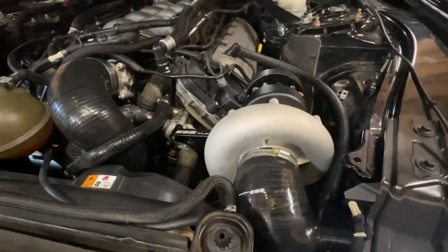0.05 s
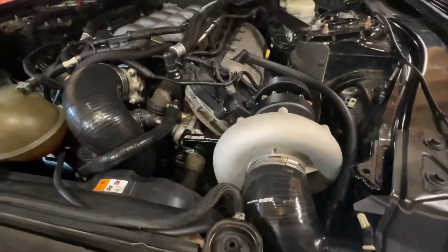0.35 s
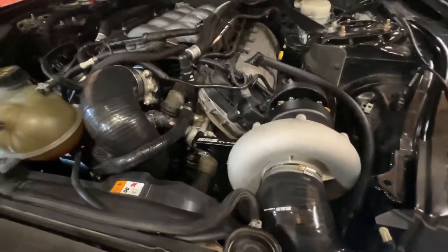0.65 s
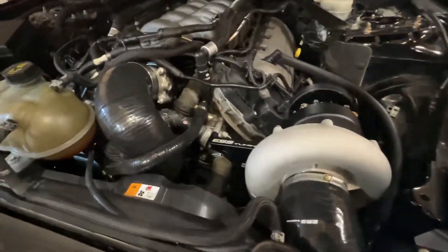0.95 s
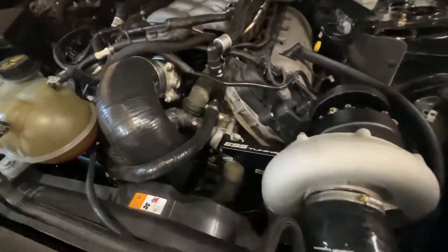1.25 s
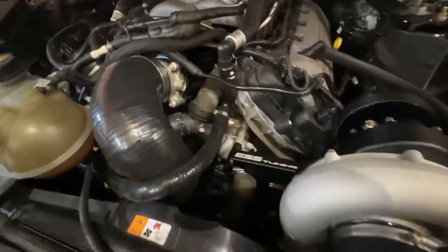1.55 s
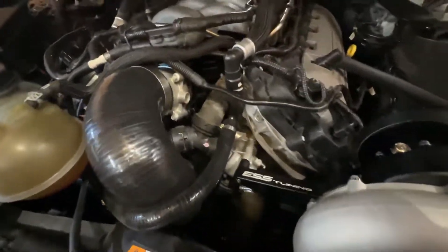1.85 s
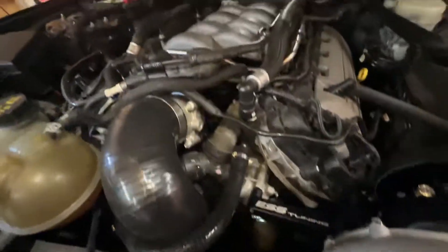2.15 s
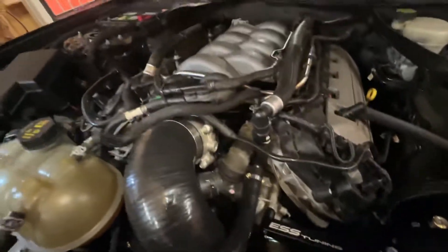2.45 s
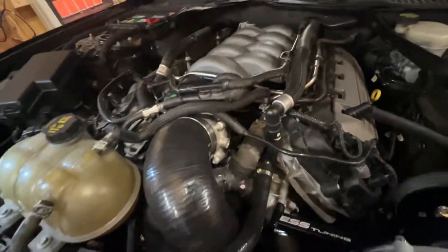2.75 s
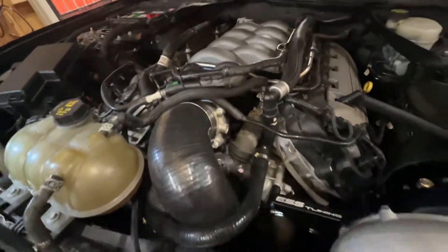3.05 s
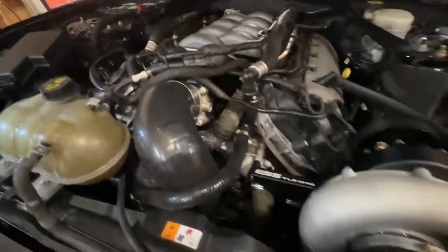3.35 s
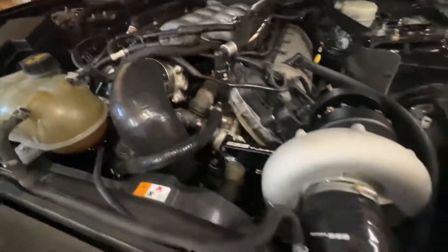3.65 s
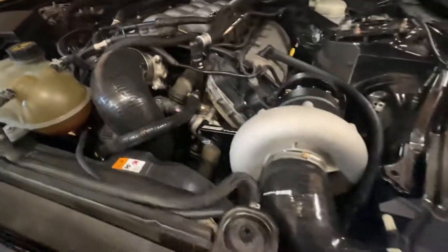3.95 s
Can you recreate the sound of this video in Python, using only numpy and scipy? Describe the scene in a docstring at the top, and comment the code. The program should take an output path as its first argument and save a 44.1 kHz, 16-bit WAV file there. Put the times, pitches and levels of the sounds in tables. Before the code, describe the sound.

Close, steady idle of a supercharged V8, droning low under whirring gears and belts.

```python
"""A supercharged V8 idles under an open bonnet, the microphone drifting close over the engine bay.
Eight unequal firings ring the exhaust into a loping drone. The supercharger gears whine and rattle,
air rushes through the throttle body, belts and fan rush, pulleys sing and the valve train ticks,
over a low rumble and a faint metallic ring. Near the end the sound skips once, with a small click,
and a soft squeak follows."""
import sys
import numpy as np
from scipy.fft import rfft, irfft, next_fast_len
from scipy.io import wavfile
from scipy.ndimage import map_coordinates

SR = 44100
rng = np.random.default_rng(int(sys.argv[2]) if len(sys.argv) > 2 else 0)


def wav_record(signal):
    """Record a signal, one row per channel, as 16-bit PCM in the file named by sys.argv[1]."""
    frames = np.transpose(np.atleast_2d(signal))
    bounded = np.clip(frames, -1, 1)
    # unit amplitude maps onto the largest positive 16-bit level
    quanta = np.round(bounded * 32767).astype(np.int16)
    wavfile.write(sys.argv[1], SR, quanta)


N = 176400
LEAD = SR // 2  # spare samples at each end
T = np.arange(-LEAD, N + LEAD) / SR
HZ = np.fft.rfftfreq(len(T), 1 / SR)
IDLE_RPM, START_CYCLE = 925, .868  # nominal speed; place in the four-stroke cycle at time zero

# How alike the microphone's two sides are. Each row: frequency in Hz, likeness from 0 to 1.
LIKENESS = [(100, .99), (250, .75), (500, .7), (1000, .72), (2000, .62), (4000, .35), (6000, .4),
            (7500, .15), (12000, .22)]
# Phase across the microphone. Each row: frequency in Hz, lead of the left in radians.
LEFT_LEAD = [(0, 3), (550, 0.5), (780, 0.5), (1050, -0.5), (1500, -3.5), (2000, -4.5), (3450, -7.5),
             (4050, -6.5), (6030, -4.5), (6630, -5), (9000, -5.5)]
# Where the broad noises sit. Each row: frequency in Hz, left minus right in dB.
BALANCE = [(100, 3), (260, 1), (600, 1), (1000, 1), (1400, 3.5), (2300, -3), (3300, 5.5), (5000, 5.5),
           (6500, 15), (7800, 1), (9000, 1), (15000, -0.5)]

# Spectra of rumble, belts, hiss and intake air. Each row: frequency in Hz, relative density in dB.
RUMBLE_SPECTRUM = [(20, -16), (45, -8), (70, 2), (130, -7), (190, 1), (350, -4), (520, -7), (900, -68)]
BELT_SPECTRUM = [(200, -14), (400, -4), (580, 2), (720, 0.5), (920, -3.5), (1080, -3), (1400, -4.5),
                 (1800, -1.5), (2300, -6), (3000, -24.5), (4500, -38)]
HISS_SPECTRUM = [(1200, -30), (2500, 3), (3200, -.5), (4700, -1.3), (6300, 1), (7600, -.8), (9000, -2.7),
                 (10000, -5.3), (11500, -6), (13000, -8.5), (15500, -8.3)]
INTAKE_SPECTRUM = [(900, -30), (1250, 12), (1700, -10), (2700, 11.5), (3200, 0.5), (3750, 5.5), (4500, 2),
                   (5500, 3), (7500, -23)]
# Resonances of the high ring and the housing; pulley and supercharger gear tones at idle.
# Each row: frequency in Hz, width in Hz, relative level in dB, left minus right in dB.
RING_MODES = [(6060, 260, -2, 10), (6680, 520, 0, 8), (5750, 350, -6, 8)]
HOUSING_MODES = [(3520, 100, 0, 0), (3750, 350, -1, 2)]
PULLEY_TONES = [(784, 17.3, -6.5, -10), (889.6, 100, -1.5, 6), (931.6, 75, -2.5, -6),
                (578.7, 40.8, -8.5, -2)]
GEAR_TONES = [(1912, 55, -3, 3.5), (2165, 70, -9, 15), (1732, 160, -15.5, -17)]
# Ring, housing, hiss with ticks, pulleys, intake and exhaust rasp at the drifting microphone.
# Each row: time in seconds, relative level in dB.
RING_LEVELS = [(0, -47), (.85, -45), (1.3, -47), (2.1, -43), (3.2, -45), (3.5, -49), (3.75, -46), (4, -50)]
HOUSING_LEVELS = [(0, -54), (.8, -50), (1.05, -57), (1.5, -50), (1.9, -46), (2.3, -48), (3.1, -48),
                  (3.32, -46), (3.55, -55), (4, -52)]
HISS_LEVELS = [(0, -41), (1, -40.7), (2.1, -39.7), (3.2, -40.5), (4, -42.3)]
PULLEY_LEVELS = [(0, -37.5), (1, -35), (1.9, -30.5), (2.6, -33), (3.3, -33), (4, -36.5)]
INTAKE_LEVELS = [(0, -45), (1.2, -42), (1.9, -41.5), (2.4, -39), (2.9, -41), (3.3, -41.5), (3.6, -48),
                 (4, -44)]
RASP_LEVELS = [(0, -31), (.4, -32.5), (1, -34.5), (2, -36.5), (2.5, -45), (3.2, -44), (3.6, -33.5),
               (4, -36)]
# Machinery at the microphone. Each row: time in seconds, belt rush and gear rattle in relative dB.
BAY_LEVELS = [(0, -29, -37), (.19, -28, -25), (.52, -29.5, -37), (.74, -29, -26.5), (1, -29, -40),
              (1.5, -28.5, -29.5), (2, -28.5, -29.5), (2.3, -30, -24), (2.65, -29.5, -25.5),
              (2.92, -30.5, -24.5), (3.2, -30.5, -23), (3.44, -29.5, -25), (3.56, -29.5, -28),
              (3.87, -29, -26), (4, -31.5, -26.5)]
# The squeak. One row: peak time in seconds, pitch in Hz, fade time in seconds, level in dB.
SOFT_SQUEAK = (3.465, 2490, .022, -34)
# Gear whirr. Each row: time in seconds, pitch in Hz, level and octave level in relative dB.
WHIRR_PATH = [(0, 1985, -28, -50), (.2, 1980, -29, -42), (.36, 2044, -28, -47), (.56, 2030, -33, -51),
              (.77, 2050, -28.5, -42), (.98, 2038, -36, -53), (1.3, 2068, -26, -42.5),
              (1.47, 2045, -35, -51), (1.6, 2054, -29, -51), (1.85, 2020, -35, -49), (2.25, 2029, -28, -45),
              (2.45, 1993, -28, -45), (2.68, 2066, -26, -47), (2.93, 2007, -26, -44),
              (3.15, 1975, -31, -50), (3.33, 1967, -29, -51), (3.6, 1976, -33, -48), (4, 1970, -33, -47)]
# Supercharger whistle. Each row: time in seconds, pitch in Hz, relative level in dB.
WHISTLE_PATH = [(0, 6090, -47), (.18, 6020, -45), (.55, 6110, -51), (.85, 6040, -46), (1.05, 6050, -42.5),
                (1.25, 6020, -47), (1.64, 6080, -46), (1.73, 6060, -38.5), (1.97, 6065, -38.5),
                (2.1, 6050, -42), (2.24, 6085, -39.5), (2.4, 6020, -42.5), (2.6, 6090, -38),
                (2.88, 5960, -41.5), (3.22, 5880, -43.5), (3.32, 6000, -43.5), (3.5, 5900, -53),
                (3.63, 5860, -47), (3.76, 5960, -42), (4, 5900, -52)]

# Crank speed. Each row: time in seconds, revolutions per minute.
CRANK_RPM = [(0, 935), (.2, 927), (.45, 935), (.8, 923), (1.05, 933), (1.25, 928), (1.6, 928.5), (2.2, 921),
             (2.55, 910.5), (2.75, 932.5), (3.05, 913), (3.4, 904), (4, 905)]
# Cylinders in firing order. Each row: strength in dB, lateness at the tailpipe in milliseconds.
FIRINGS = [(1, 1), (.1, 1.26), (-1.7, -2.28), (1.8, -1.17), (-4.4, .3), (-5.4, .65), (-9.2, -.91),
           (.3, 1.36)]
# Exhaust resonances, low to high. Each row: frequency in Hz, width in Hz, relative level in dB.
BOOM_MODES = [(65, 6.2, 0)]
DRONE_MODES = [(114, 18.3, 1), (141, 41, -46), (177.2, 10.8, -18), (212.4, 33, -30)]
GROWL_MODES = [(254.8, 15.2, 4), (274.6, 18, -13)]
RASP_MODES = [(320.8, 17, 3.5), (350.2, 11.6, -7)]
# Exhaust at the microphone. Each row: time in seconds, then boom, drone and growl in dB.
EXHAUST_LEVELS = [(0, -25, -17, -32), (.4, -21.5, -16, -29), (1.4, -24.5, -16.5, -31),
                  (2.2, -23.5, -16, -34), (2.55, -28.5, -20, -36.5), (2.78, -23, -15.5, -34.5),
                  (3.25, -27.5, -20, -33), (3.48, -24.5, -18, -33), (3.75, -26, -20.5, -33.5),
                  (4, -26.5, -20, -34)]


def amp(db):
    """Decibels to gain."""
    return 10 ** (np.asarray(db) / 20)


def unit(x):
    """Scaled to rms 1."""
    return x / np.sqrt(np.mean(np.abs(x) ** 2) + 1e-20)


def along(points):
    """(Hz, value) points read on a log frequency axis."""
    hz, values = np.transpose(points)
    return np.interp(np.log(HZ + 1), np.log(hz + 1), values)


def curves(rows):
    """One value per sample for each column after the time."""
    times, *columns = np.transpose(rows)
    return [np.interp(T, times, column) for column in columns]


def fader(levels):
    """A gain curve from (seconds, dB) points."""
    return amp(curves(levels)[0])


def wobble(rate):
    """A smooth random curve, rate knots a second."""
    return map_coordinates(rng.standard_normal(4096), [(T - T[0]) * rate], mode="wrap")


def noise():
    """Two unrelated white noises."""
    return rng.standard_normal((2, len(T)))


def filtered(x, response):
    """x times a response on the frequency grid."""
    return irfft(rfft(x) * response, len(T))


def panned(db):
    """Left and right gains, the left louder by db."""
    return np.sqrt(2 / (1 + np.array([amp(-db), amp(db)]) ** 2)).reshape(2, -1)


def placed(pair):
    """Two unrelated signals become the partly alike left and right of the microphone."""
    turn = np.arccos(np.clip(along(LIKENESS), -1, 1)) / 2
    mid, side = filtered(pair, np.array([np.cos(turn), np.sin(turn)]))
    phase_shift = np.exp(.5j * np.outer([1, -1], along(LEFT_LEAD)))
    return filtered(np.array([mid + side, mid - side]), phase_shift)


def spread(pair, spectrum):
    """Two unrelated signals coloured and spread across the microphone, rms 1."""
    return unit(filtered(placed(pair), amp(along(spectrum)) * panned(along(BALANCE))))


def strokes(cycle, count):
    """Number within the cycle and time of something that happens count times a cycle."""
    n = np.arange(np.ceil(cycle[0] * count), cycle[-1] * count).astype(int)
    return n % count, np.interp(n / count, cycle, T)


def pulses(times, sizes):
    """Impulses at the given times."""
    samples = np.round((times - T[0]) * SR).astype(int) % len(T)
    return np.bincount(samples, sizes, len(T))


def tone(hz, width, pan_db):
    """A tone on a pitch curve; backlash makes the pitch stray, the wider the faster."""
    stray_hz = width / 2 * np.array([wobble(rate=1.6 * width), wobble(rate=1.6 * width)])
    phase = 2 * np.pi * np.cumsum(hz + stray_hz, axis=1) / SR
    return panned(pan_db) * unit(placed(np.sin(phase)))


def flutter(depth_db=3.5):
    """The quick, uneven swelling of meshing gears, rms 1."""
    return unit(amp(depth_db * wobble(rate=105)))


def whine(tones, speed):
    """Tones that follow the shaft speed, each with its own flutter."""
    return sum(amp(db) * flutter() * tone(hz * speed, width, pan_db) for hz, width, db, pan_db in tones)


def rumble():
    """A low, steady noise behind the engine."""
    return amp(-31) * spread(noise(), RUMBLE_SPECTRUM)


def metal_ring(modes, levels):
    """Metal such as the housing and brackets, kept ringing by random contact that comes and goes."""
    power = 0
    for hz, width, db, pan_db in modes:
        peak = unit(1 / (1 + (2 * (HZ - hz) / width) ** 2))
        power += (amp(db) * panned(pan_db) * peak) ** 2
    ring = filtered(placed(noise()), np.sqrt(power))
    contact = unit(amp(1.4 * wobble(rate=8.8)))
    return fader(levels) * ring * contact


def squeak():
    """A short, soft squeak that swells and fades, dead centre."""
    peak_s, hz, fade_s, db = SOFT_SQUEAK
    return amp(db) * np.exp(-((T - peak_s) / fade_s) ** 2) * tone(hz, width=59.7, pan_db=0)


def intake():
    """Air rushing through the throttle body, to the left, louder as the microphone nears it."""
    air = unit(filtered(placed(noise()), amp(along(INTAKE_SPECTRUM))))
    return fader(INTAKE_LEVELS) * panned(db=5.5) * air


def valve_train(cycle, decay_s=.003, scatter_db=1.8, jitter_s=.0016):
    """Valves and injectors: short, loosely timed ticks tied to the camshaft, in a flickering hiss."""
    _, times = strokes(cycle, count=16)
    size, slip = rng.standard_normal((2, len(times)))
    impacts = pulses(times + jitter_s * slip, amp(scatter_db * size))
    decays = filtered(impacts, 1 / (1 + 2j * np.pi * HZ * decay_s))
    ticks = amp(-4.5) * spread(decays * noise(), HISS_SPECTRUM)
    hiss = amp(.5) * spread(noise(), HISS_SPECTRUM)
    flicker = amp(.9 * wobble(rate=82))
    return fader(HISS_LEVELS) * flicker * (hiss + ticks)


def pulleys(speed):
    """The pulleys sing, their pitch following the crank."""
    return fader(PULLEY_LEVELS) * whine(PULLEY_TONES, speed)


def belts(boost_db=2, flicker_db=1.23):
    """Belts and fan: a broad, flickering rush close to the microphone."""
    rush_db, _ = curves(BAY_LEVELS)
    return amp(rush_db + boost_db + flicker_db * wobble(rate=110)) * spread(noise(), BELT_SPECTRUM)


def supercharger(speed):
    """Meshing gears rattle and whirr; a thin, raspy whistle comes and goes on the left."""
    _, rattle_db = curves(BAY_LEVELS)
    whirr_hz, whirr_db, octave_db = curves(WHIRR_PATH)
    whistle_hz, whistle_db = curves(WHISTLE_PATH)
    whirr = amp(whirr_db) * tone(whirr_hz, width=65, pan_db=-3.5)
    octave = amp(octave_db) * tone(2 * whirr_hz, width=130, pan_db=2.5)
    whistle = amp(whistle_db) * tone(whistle_hz, width=140, pan_db=11)
    rattle = amp(rattle_db) * whine(GEAR_TONES, speed)
    return rattle + (whirr + octave) * flutter() + whistle * flutter()


def pipe(firing, modes):
    """Firing pulses ring the exhaust's steep resonances, rms 1."""
    response = 0
    for hz, width, db in modes:
        band = 1j * HZ * width / (hz ** 2 - HZ ** 2 + 1j * HZ * width)
        response += amp(db) * band ** 2
    return unit(filtered(firing, response))


def exhaust(cycle, scatter_db=.8, jitter_ms=.16, growl_lope_db=1, rasp_lope_db=6.5):
    """Each cylinder sends its own pulse down the pipes; the uneven pattern makes the lope."""
    cylinder, times = strokes(cycle, count=8)
    strength_db, late_ms = np.array(FIRINGS)[cylinder].T
    size, slip = rng.standard_normal((2, len(times)))
    late_s = (late_ms + jitter_ms * slip) / 1000
    firing = pulses(times + late_s, amp(strength_db + scatter_db * size))
    boom_db, drone_db, growl_db = curves(EXHAUST_LEVELS)
    lope = np.cos(2 * np.pi * (cycle - .93))  # one swell, late in each cycle
    boom = amp(boom_db) * pipe(firing, BOOM_MODES)
    drone = amp(drone_db) * pipe(firing, DRONE_MODES)
    growl = amp(growl_db) * unit(pipe(firing, GROWL_MODES) * amp(growl_lope_db * lope))
    rasp = fader(RASP_LEVELS) * unit(pipe(firing, RASP_MODES) * amp(rasp_lope_db * lope))
    return boom + drone + (growl + rasp) * panned(db=-4.5)


def skipped(x, at_s=3.4232, jump_s=.025, click_db=-17.5, click_decay_s=.00008):
    """N samples of x in which the sound jumps ahead a moment, with a click."""
    n, at = np.arange(N), round(at_s * SR)
    after = n >= at
    click = amp(click_db) * after * np.exp(-np.abs(n - at) / SR / click_decay_s)
    return x[:, LEAD + n + after * round(jump_s * SR)] + click


def scene():
    """The engine bay from above; the crank paces the firings, ticks, pulleys and gear rattle."""
    rpm = curves(CRANK_RPM)[0]
    speed = rpm / IDLE_RPM
    turns = np.cumsum(rpm) / 60 / SR
    cycle = START_CYCLE + (turns - turns[LEAD]) / 2  # two turns to a four-stroke cycle
    metal = metal_ring(RING_MODES, RING_LEVELS) + metal_ring(HOUSING_MODES, HOUSING_LEVELS)
    treble = metal + intake() + valve_train(cycle) + supercharger(speed)
    flicker = amp(.88 * wobble(rate=65))
    return skipped(rumble() + squeak() + pulleys(speed) + belts() + flicker * treble + exhaust(cycle))


def record(dry, top_hz=15850):
    """The microphone chain passes nothing above its band limit."""
    size = next_fast_len(N + LEAD)
    passband = np.fft.rfftfreq(size, 1 / SR) < top_hz
    return irfft(rfft(dry, size) * passband, size)[:, :N]


dry = scene()
out = record(dry)
wav_record(out)
```